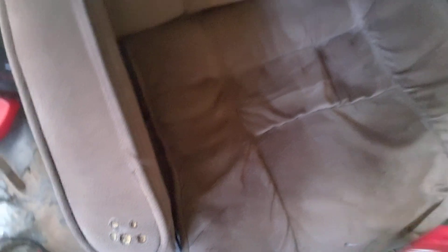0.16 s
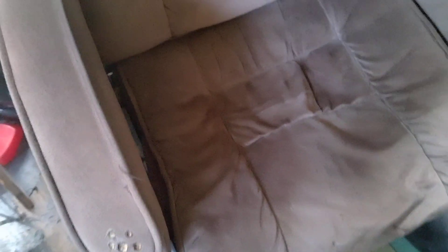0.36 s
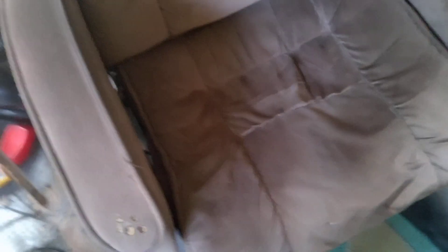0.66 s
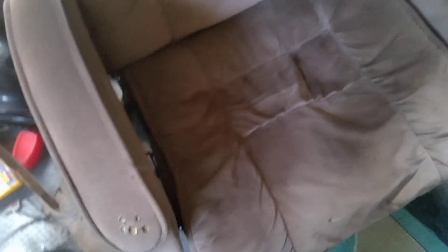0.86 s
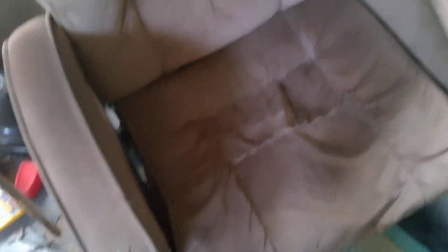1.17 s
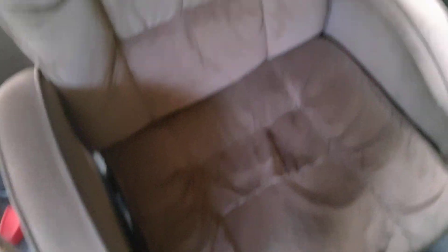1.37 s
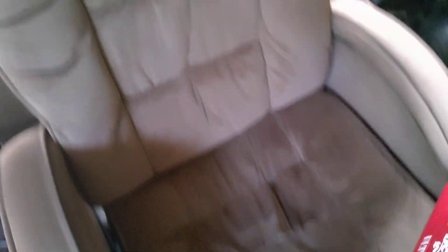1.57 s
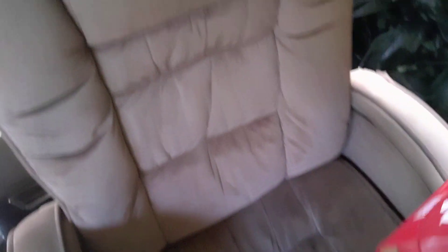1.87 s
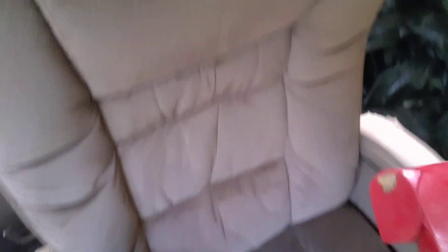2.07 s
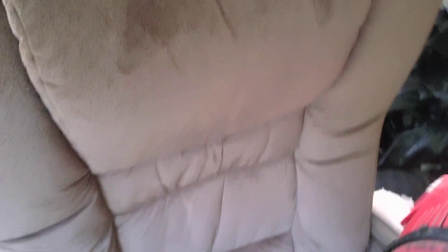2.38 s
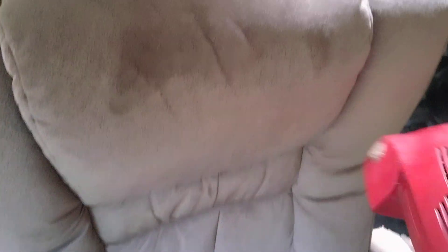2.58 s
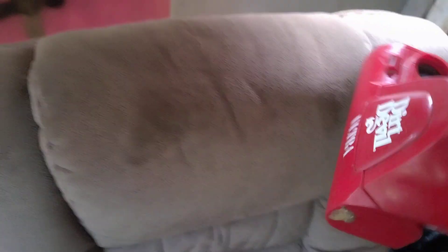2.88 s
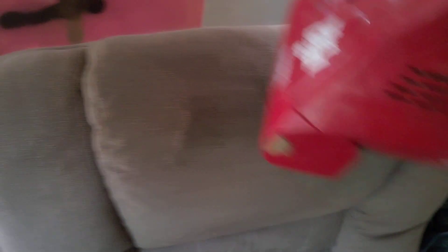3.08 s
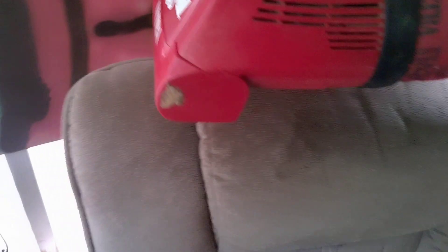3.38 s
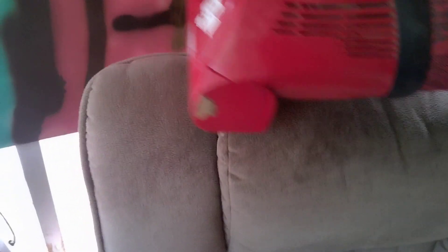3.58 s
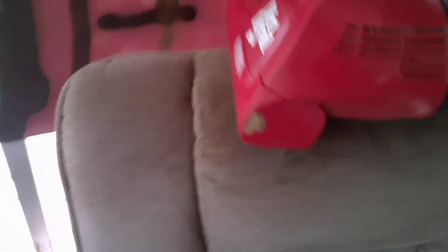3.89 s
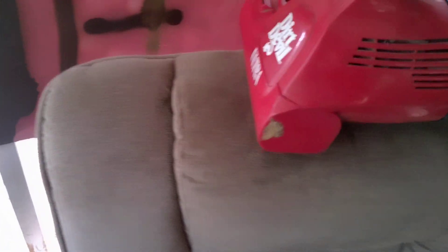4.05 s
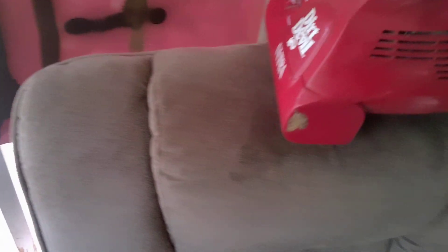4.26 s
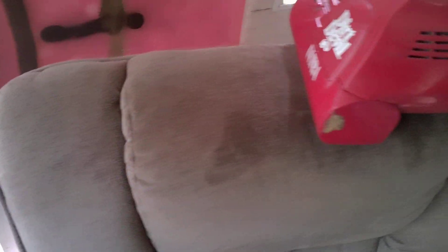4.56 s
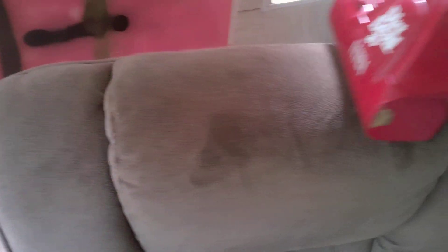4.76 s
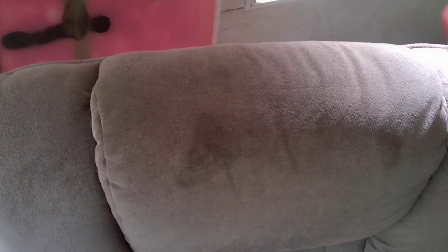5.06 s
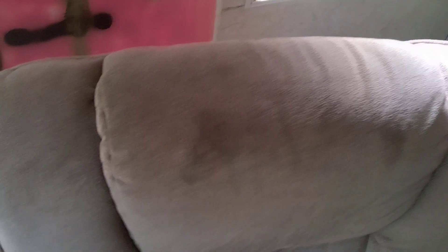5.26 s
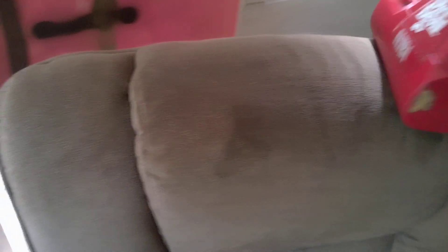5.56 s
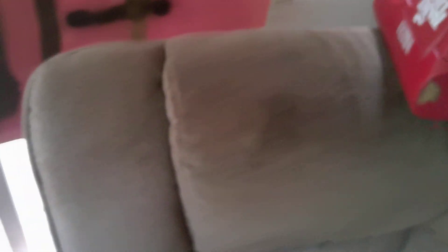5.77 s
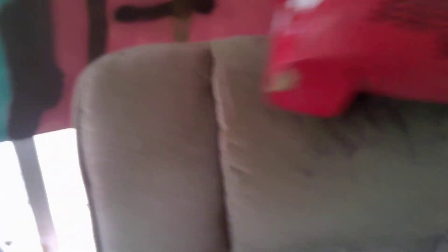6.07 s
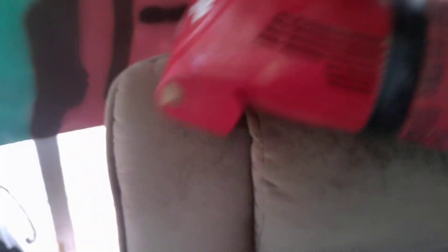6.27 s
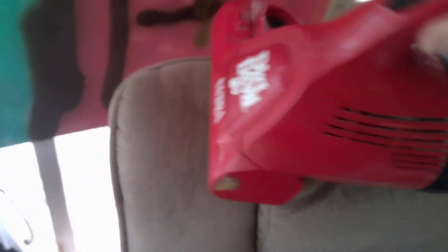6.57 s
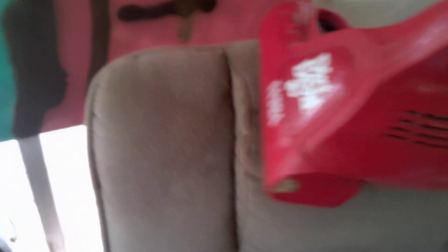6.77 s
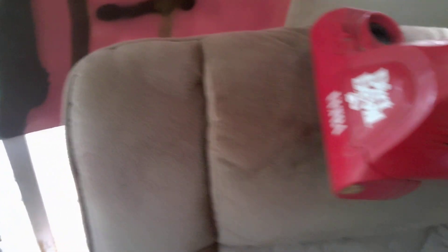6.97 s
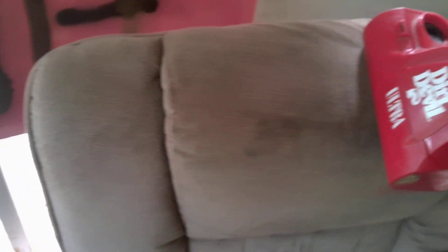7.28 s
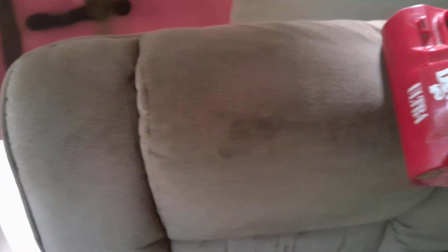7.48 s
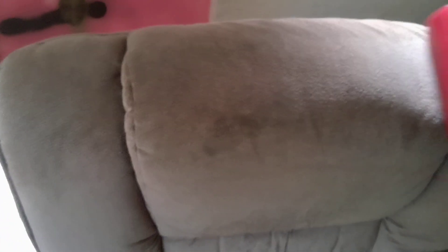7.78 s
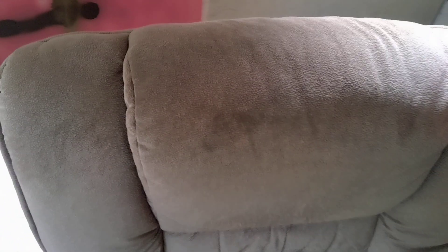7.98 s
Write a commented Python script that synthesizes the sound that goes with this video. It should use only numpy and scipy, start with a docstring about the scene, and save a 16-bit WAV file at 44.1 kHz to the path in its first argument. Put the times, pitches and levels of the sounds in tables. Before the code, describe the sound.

A high, steady motor whine and a rush of hissing air come from a small vacuum cleaner working on a fabric armchair, close to the microphone and slightly left. At first the air has a shifting, hollow colour as the gap to the cushion changes. Then the nozzle lies on the fabric and the sound grows a little fuller. The whine flutters in loudness but holds its pitch, and the motor runs throughout.

```python
"""A handheld vacuum cleaner moves over an armchair, close to a hand-swayed camera with two spaced mics.
From the start its motor sings on multiples of the shaft speed, loudest on the 27th, over a faint mains hum
and the roar and hiss of air; the left mic hears it first, by a lead that follows the machine's bearing.
In the first three seconds hollow resonances slide as the gap to the cushion changes. Then the nozzle lies
on the cushion and the housing's resonances stand out. Near 7 s a faint low moan slides up and fades."""
import sys
import numpy as np
from scipy import signal
from scipy.fft import rfft, irfft, next_fast_len
from scipy.io import wavfile
from scipy.ndimage import uniform_filter1d, map_coordinates

SR = 44100
rng = np.random.default_rng(int(sys.argv[2]) if len(sys.argv) > 2 else 0)


def waveform_to_disk(signal):
    """Save audio, clipped to [-1, 1], as 16-bit WAV at the path in sys.argv[1]."""
    frames = np.transpose(np.atleast_2d(signal))
    scaled = np.clip(frames, -1, 1) * 32767
    samples = np.round(scaled).astype(np.int16)
    wavfile.write(sys.argv[1], SR, samples)


N = 358974
TIME = np.arange(N) / SR
COARSE = np.linspace(0, N / SR, 1000)  # time grid for slow moves, s
MAINS_PULSE_HZ = 120  # twice the mains rate
# an order is a multiple of the shaft speed
WHINE_ORDER, HUM_ORDERS, VENT_ORDERS = 27, (1, 2, 3, 5), (10, 11, 15, 17, 18, 25, 29, 36)
ECHO_SHIFTED_ORDERS = (2, 10, 17, 25)

# motor speed and the whine's stereo position: [t/s, shaft f/Hz, left lead/ms]
SHAFT = [(0.0, 348.63, 0.186), (0.21, 348.49, 0.205), (0.51, 349.22, 0.334), (0.95, 349.97, 0.383),
         (1.48, 349.41, 0.27), (2.11, 349.8, 0.257), (2.35, 349.04, 0.182), (2.43, 349.17, 0.178),
         (2.52, 350.07, 0.216), (2.57, 350.11, 0.297), (2.89, 349.72, 0.35), (2.99, 349.98, 0.368),
         (3.11, 349.7, 0.335), (3.26, 349.4, 0.235), (3.41, 349.57, 0.159), (3.71, 349.37, 0.174),
         (4.08, 347.99, 0.223), (4.85, 348.21, 0.308), (4.99, 347.84, 0.376), (5.25, 346.52, 0.452),
         (5.34, 346.9, 0.447), (5.48, 348.14, 0.457), (5.56, 348.55, 0.513), (5.77, 346.87, 0.48),
         (5.89, 346.51, 0.502), (6.1, 347.73, 0.413), (6.36, 348.36, 0.266), (6.5, 348.63, 0.258),
         (6.64, 348.23, 0.316), (6.79, 348.76, 0.331), (6.92, 347.93, 0.299), (7.04, 347.64, 0.341),
         (7.53, 347.71, 0.382), (8.13, 346.77, 0.45)]
# the whine's level ride: [t/s, left level/dB, right level/dB]
WHINE_LEVELS = [(0.0, -33.5, -46.5), (0.1, -32.5, -36.5), (0.13, -26.5, -27.0), (0.19, -21.5, -21.5),
                (0.28, -18.0, -25.5), (0.34, -25.0, -30.0), (0.42, -19.5, -26.5), (0.48, -20.0, -39.5),
                (0.54, -22.0, -27.0), (0.67, -25.5, -35.0), (0.75, -22.5, -27.5), (0.81, -26.5, -31.5),
                (0.93, -23.5, -24.5), (1.09, -23.0, -31.0), (1.29, -19.0, -29.5), (1.58, -27.5, -31.0),
                (1.64, -21.0, -28.0), (1.73, -17.0, -33.0), (1.93, -21.0, -30.0), (2.05, -18.5, -23.0),
                (2.19, -16.0, -24.5), (2.39, -26.5, -29.0), (2.45, -25.5, -33.5), (2.51, -38.0, -37.0),
                (2.58, -25.0, -33.5), (2.64, -22.0, -37.5), (2.7, -22.0, -24.0), (2.86, -15.5, -26.0),
                (2.9, -15.5, -26.5), (3.01, -17.0, -47.0), (3.07, -15.5, -30.5), (3.12, -16.5, -32.0),
                (3.14, -17.0, -40.5), (3.19, -17.0, -28.5), (3.29, -17.5, -22.5), (3.34, -15.0, -29.5),
                (3.44, -17.0, -26.0), (3.62, -23.0, -31.0), (3.83, -17.5, -22.5), (4.04, -17.0, -25.0),
                (4.31, -16.5, -20.5), (4.67, -15.0, -29.0), (4.87, -16.5, -25.0), (4.95, -18.0, -34.0),
                (5.03, -17.0, -26.5), (5.14, -20.5, -42.5), (5.18, -19.5, -34.0), (5.27, -17.5, -29.0),
                (5.49, -17.0, -35.5), (5.55, -21.0, -31.0), (5.8, -18.0, -27.0), (5.85, -19.0, -30.0),
                (5.93, -21.0, -26.0), (6.04, -17.5, -35.0), (6.1, -23.0, -25.5), (6.19, -20.0, -31.0),
                (6.26, -19.5, -25.0), (6.32, -16.5, -25.0), (6.54, -20.5, -20.5), (6.62, -18.0, -20.5),
                (6.69, -15.5, -34.0), (6.81, -18.5, -35.5), (6.88, -15.5, -44.0), (6.94, -17.0, -33.5),
                (7.06, -18.5, -32.5), (7.27, -22.5, -47.5), (7.33, -25.0, -39.0), (7.64, -20.0, -34.0),
                (7.76, -25.0, -35.5), (7.92, -26.5, -46.0), (8.05, -29.5, -30.5), (8.13, -35.0, -39.5)]
# bearing: [t/s, left lead/ms of the air and most tones, then left lead/ms of each ECHO_SHIFTED_ORDERS tone]
LEFT_LEADS = [(0.0, 0.157, 0.091, 0.204, 0.157, 0.144), (0.2, 0.194, 0.173, 0.163, 0.194, 0.202),
              (0.42, 0.299, 0.427, 0.32, 0.276, 0.303), (0.53, 0.337, 0.553, 0.359, 0.339, 0.343),
              (0.89, 0.377, 0.527, 0.459, 0.37, 0.382), (1.46, 0.286, 0.421, 0.282, 0.301, 0.293),
              (2.01, 0.262, 0.047, 0.284, 0.274, 0.265), (2.47, 0.16, -0.103, 0.184, 0.16, 0.179),
              (2.64, 0.204, -0.018, 0.181, 0.199, 0.214), (3.04, 0.253, -0.131, 0.253, 0.271, 0.272),
              (3.17, 0.214, 0.03, 0.232, 0.206, 0.205), (3.33, 0.115, 0.252, 0.117, 0.093, 0.089),
              (3.41, 0.076, 0.232, 0.088, 0.037, 0.057), (3.56, 0.039, 0.063, 0.06, 0.032, 0.033),
              (4.05, 0.135, 0.181, 0.141, 0.026, 0.117), (4.81, 0.205, 0.263, 0.21, 0.013, 0.162),
              (5.15, 0.308, 0.686, 0.276, 0.121, 0.309), (5.45, 0.318, 0.64, 0.476, 0.131, 0.317),
              (5.68, 0.275, 0.512, 0.561, 0.043, 0.273), (5.97, 0.258, 0.254, 0.548, 0.088, 0.257),
              (6.12, 0.192, 0.135, 0.492, 0.043, 0.175), (6.28, 0.086, 0.012, 0.377, -0.044, 0.081),
              (6.43, 0.05, -0.013, 0.34, -0.102, 0.032), (7.09, 0.22, 0.024, 0.524, 0.045, 0.215),
              (7.7, 0.278, 0.515, 0.558, 0.119, 0.259), (8.14, 0.341, 0.466, 0.643, 0.183, 0.366)]
# low motor hum as the housing turns: [t/s, then left level/dB, right level/dB for each of HUM_ORDERS]
HUM_LEVELS = [(0.0, -56, -48, -44, -45, -41, -43, -44, -60), (0.37, -51, -57, -60, -56, -52, -55, -49, -46),
              (0.49, -49, -57, -58, -48, -51, -55, -43, -42),
              (1.06, -54, -62, -45, -55, -51, -50, -55, -59),
              (1.51, -46, -48, -49, -48, -58, -60, -41, -50),
              (2.02, -47, -45, -48, -47, -45, -49, -42, -60),
              (2.22, -45, -44, -44, -40, -53, -54, -38, -43),
              (2.53, -41, -43, -53, -46, -55, -53, -47, -45),
              (3.04, -46, -54, -46, -54, -45, -47, -39, -50),
              (3.44, -46, -44, -48, -43, -43, -43, -45, -60),
              (3.73, -57, -58, -47, -40, -46, -53, -48, -55),
              (4.36, -51, -50, -56, -45, -46, -48, -55, -50),
              (4.83, -52, -53, -47, -56, -52, -49, -57, -48),
              (5.07, -52, -53, -50, -51, -54, -49, -50, -55), (5.4, -48, -49, -49, -56, -56, -48, -57, -54),
              (5.71, -55, -52, -52, -49, -44, -45, -42, -51),
              (6.09, -51, -52, -59, -46, -42, -52, -58, -44),
              (6.34, -56, -57, -47, -40, -44, -49, -51, -52),
              (6.73, -46, -49, -60, -43, -47, -49, -48, -45),
              (7.26, -51, -54, -52, -43, -55, -55, -55, -45),
              (7.82, -56, -62, -48, -49, -60, -58, -45, -46),
              (8.13, -52, -50, -48, -53, -52, -52, -56, -46)]
# tones that swing as the vents turn: [t/s, then left level/dB, right level/dB for each of VENT_ORDERS]
VENT_LEVELS = [(0.0, -36, -47, -37, -38, -40, -50, -31, -41, -37, -36, -29, -35, -36, -43, -39, -44),
               (0.17, -44, -50, -45, -51, -44, -43, -36, -40, -38, -45, -37, -30, -34, -43, -45, -53),
               (0.43, -36, -45, -40, -46, -39, -50, -38, -48, -51, -47, -30, -40, -45, -43, -40, -51),
               (0.8, -39, -48, -41, -52, -45, -56, -38, -42, -46, -49, -39, -41, -33, -56, -40, -54),
               (1.15, -44, -53, -52, -49, -52, -48, -36, -42, -38, -41, -31, -33, -48, -46, -49, -52),
               (1.46, -45, -42, -43, -53, -42, -45, -33, -37, -43, -46, -30, -47, -37, -54, -37, -48),
               (1.74, -40, -42, -36, -46, -48, -48, -38, -46, -51, -49, -34, -37, -41, -53, -38, -47),
               (2.27, -38, -45, -44, -43, -41, -42, -33, -38, -39, -40, -29, -31, -34, -36, -41, -52),
               (2.54, -49, -40, -50, -41, -49, -48, -37, -36, -48, -48, -40, -38, -45, -59, -55, -54),
               (2.71, -40, -40, -38, -43, -40, -44, -29, -33, -44, -39, -33, -27, -34, -43, -41, -50),
               (2.95, -38, -47, -39, -39, -42, -39, -32, -47, -40, -41, -28, -40, -34, -47, -39, -40),
               (3.52, -39, -40, -43, -42, -40, -46, -34, -41, -34, -44, -29, -29, -32, -41, -49, -50),
               (3.69, -40, -44, -45, -45, -37, -46, -33, -49, -38, -39, -24, -37, -32, -40, -49, -49),
               (3.93, -40, -43, -37, -38, -43, -40, -34, -42, -36, -52, -31, -32, -34, -53, -42, -51),
               (4.56, -38, -39, -46, -40, -39, -44, -35, -46, -42, -48, -27, -33, -35, -41, -46, -52),
               (4.77, -37, -42, -45, -56, -46, -46, -34, -45, -41, -46, -33, -40, -36, -43, -45, -49),
               (5.1, -37, -45, -43, -44, -44, -46, -37, -47, -44, -47, -29, -38, -33, -47, -42, -49),
               (5.4, -38, -50, -52, -45, -48, -52, -37, -50, -44, -43, -30, -41, -34, -49, -52, -56),
               (5.63, -38, -46, -45, -40, -42, -44, -47, -46, -37, -49, -29, -35, -31, -52, -42, -50),
               (6.12, -37, -38, -41, -44, -44, -53, -33, -47, -36, -47, -28, -37, -36, -44, -43, -55),
               (6.29, -40, -44, -46, -46, -42, -49, -27, -51, -40, -40, -28, -28, -35, -43, -48, -54),
               (6.53, -38, -39, -40, -40, -39, -38, -32, -44, -32, -43, -28, -34, -34, -50, -47, -43),
               (6.96, -38, -39, -37, -42, -37, -40, -36, -47, -43, -41, -38, -46, -39, -42, -43, -46),
               (7.19, -32, -42, -41, -43, -40, -44, -37, -40, -44, -51, -31, -31, -38, -48, -41, -47),
               (7.46, -38, -39, -38, -39, -38, -41, -45, -43, -40, -45, -39, -44, -37, -46, -39, -48),
               (7.58, -35, -44, -38, -43, -41, -44, -47, -46, -43, -57, -33, -34, -37, -51, -37, -48),
               (8.13, -34, -41, -41, -54, -44, -47, -41, -44, -39, -39, -36, -44, -41, -56, -42, -51)]
# the bed of remaining motor tones: [order, left base level/dB, right base level/dB]
BED_TONES = [(4, -52, -59), (6, -56, -56), (7, -50, -51), (8, -49, -49), (9, -46, -47), (12, -52, -54),
             (13, -51, -50), (14, -56, -57), (16, -46, -52), (19, -54, -56), (20, -44, -46), (21, -49, -50),
             (22, -51, -55), (23, -42, -46), (24, -42, -46), (26, -41, -46), (28, -42, -52), (30, -50, -57),
             (31, -56, -57), (32, -46, -54), (33, -51, -57), (34, -48, -56), (37, -52, -59), (38, -53, -61)]
# swells of the air layers: [t/s, then left gain/dB, right gain/dB for each of 0 thrum through the chair,
# 1 housing rumble, 2 nozzle boom, 3 rush, 4 upper rush, 5 vent hiss]
AIR_SWELLS = [(0.0, 0, -5, 3, -1, 3, 6, 3, 5, 5, 2.0, 0.5, 5),
              (0.15, -2, -3, 3, 1.5, -2, -3, 1, 2.5, 0, 2, 3.5, -3),
              (0.4, -9, -9, 1, -1.5, -4.5, -7, -3.5, -3, -2, -2.5, -5, -0.5),
              (0.75, -6, -8, -0.5, 0, -3.5, -7, -3, -3, -1.5, -3.5, -2.5, -5),
              (1.25, -5, -7, 0.5, 0, -2, -2, -2, -1.5, -3, -3.5, -0.0, 1),
              (1.7, -4, -3.0, 0.5, 0, -1.5, -4, -3, -2.5, -0.5, -0.5, -1.5, -3),
              (1.8, -6, -5, -0.5, -2, 2, -2, -2, -3, -0.5, 3, -1, -9),
              (2.3, -3, -4, 1.5, 1.0, -0.5, -2, -1, 3, 2, -0.5, -3, 5),
              (2.4, -4, -5.5, 1.5, 0.5, -4, -1.5, 1.5, 2, 0.5, 0.5, -0.5, 2),
              (2.9, 0.5, -2, 1.5, 1.5, 4.5, -1.5, 2.5, 2.5, 2, 2.5, 1.5, 2),
              (3.25, 0, 3, 3.5, 1.0, 1.5, 2, 4.5, 4.5, 2.5, 4, 3, 1.5),
              (3.4, 3, -2, 3, 2, 5.5, 5.5, 0, 3.5, 1, 3, 0.5, 4),
              (4.25, 1, 3, 1.5, -2.5, -1.5, -2, 1.5, 2.5, -1.5, 1.5, 2, 0),
              (5.05, 1.0, -1.5, 0.5, 1, -4.5, -4, -0.5, 2, 0.5, -1, -0.5, -1.5),
              (5.15, -2.0, -2, -1, -2, -3, -5, -0.5, -2, -0.5, 0, -2, -5),
              (5.5, 1, -2, 4, 3, -3, -3, 1, 1.5, -0.5, -0.5, 2, 0),
              (5.8, 1, -1, 0, 0, 0, -3, 0.5, -0.5, -0.5, 0, 1, -4),
              (6.1, 1, 2.5, 0, -1, -0.5, 3, 0.5, 3, 1, 1, 1.5, 3),
              (6.65, 2.5, 3, 0, 1, 3, 1.5, 3.5, 3.5, 0, 3.5, 0.5, 2),
              (7.15, 0, -1, -1.5, -1.5, -2, -3, 0, 0.5, 1.5, -1, -1.0, -1),
              (7.95, 1, 1, 0, -3, -3.5, -5, -2, -2.5, -2, 0.5, -3, -3),
              (8.14, -4, -4.0, 1, -4, -6, -7, -3.5, -1, 0.5, 0, -3.5, -8)]
# crossovers between the air layers: [f/Hz, layer that rules there]
AIR_LAYERS = [(70, 1), (110, 0), (200, 0), (300, 1), (560, 1), (720, 2), (1000, 2), (1200, 3), (2400, 3),
              (3100, 4), (5000, 4), (7000, 5)]
# tone colour and width of the air: [f/Hz, left relative level/dB, right relative level/dB, likeness 0-1]
AIR_SPECTRUM = [(70, -41, -25.5, 1), (127, -16, -17, 1), (218, -15, -13.5, 1), (403, -4, -6, 0.95),
                (480, -4.5, -5.5, 0.93), (630, -7.5, -6, 0.72), (794, -4.5, -1, 1), (910, -4.5, -3.5, 0.4),
                (1110, -6.5, -10, 0.82), (1540, -5.5, -8, 0.15), (2220, -6, -7.5, 0.3),
                (3300, -10.5, -12.5, 0.78), (4530, -12.5, -15.5, 0.48), (6040, -9, -8, 0.4),
                (6560, -9.5, -12.5, 0), (9000, 0.5, -3.5, 0.64), (9970, -3, -10, 0.1),
                (11220, -16, -18.5, 0), (14200, -22.5, -28, 0.2)]
# quick random level flicker laid over the hiss, deepest near 4 and 12.5 kHz: [f/Hz, depth/dB]
TREBLE_FLICKER = [(300, 1), (2000, 2), (4000, 6), (8000, 3), (12500, 6)]
# hollow resonance between machine and cushion, sliding with the gap: [t/s, f/Hz, gain/dB]
GAP_HOLLOW = [(0, 1020, 12), (.3, 1010, 3), (.55, 995, 13.5), (1.0, 967, 11), (1.45, 900, 7.5),
              (1.75, 880, -2), (1.95, 780, -6), (2.2, 830, 9), (2.45, 900, 5), (2.7, 930, 4)]
# a lower hollow, strongest near 1.5 s: [t/s, f/Hz, gain/dB]
DEEP_HOLLOW = [(.9, 600, -1), (1.2, 563, 5), (1.5, 526, 7), (1.85, 482, 3)]
# narrow peaks and dips of the housing: [f/Hz, width/Hz, left base gain/dB, right base gain/dB]
HOUSING_PEAKS = [(400, 18, -4, 2.5), (493, 20, 4, 2), (488, 76, -2.5, -8.5), (570, 72, -3, 2)]
# they stand out once the nozzle lies on the cushion: [t/s, factor on their base gain]
HOUSING_DEPTH = [(0, -0.1), (2.9, 0.5), (3.5, 2.9), (6.2, 2.3), (6.7, 1.5), (8.14, 0.9)]
# sub rumble of the swaying camera: [f/Hz, relative level/dB]
SWAY_SPECTRUM = [(2, 1.5), (8, -16), (20, -23), (45, -27), (90, -50)]
# glide and fade of the moan: [t/s, f/Hz, level/dB]
MOAN_GLIDE = [(6.95, 130, -80), (7.06, 137, -57), (7.33, 153, -55), (7.52, 151, -57), (7.62, 148, -80)]


def amp(db):
    """Decibels to gain."""
    return 10 ** (np.asarray(db) / 20)


def read(rows, at):
    """The columns after the first, joined by straight lines."""
    first, *cols = np.transpose(rows)
    return np.array([np.interp(at, first, c) for c in cols])


def read_hz(rows, hz):
    """Columns over frequency, on a log axis."""
    rows = np.array(rows, float)
    return read(np.c_[np.log(rows[:, 0]), rows[:, 1:]], np.log(hz + 1e-3))


def wobble(rate, count=2):
    """Smooth random curves on the coarse grid, rate knots a second; by default one per mic."""
    knots = rng.standard_normal((count, 400))
    return np.array([map_coordinates(k, [COARSE * rate]) for k in knots])


def per_sample(curves):
    """Coarse curves brought up to audio rate."""
    return np.array([np.interp(TIME, COARSE, curve) for curve in curves])


def envelope(db):
    """Audio-rate gains from coarse levels."""
    return per_sample(amp(db))


def patches(shape, bins, frames):
    """A random field of spread 1, smooth over some frequency bins and time frames."""
    field = uniform_filter1d(rng.standard_normal(shape), size=bins, axis=1)
    field = uniform_filter1d(field, size=frames, axis=2)
    return field / field.std()


def filtered(x, response):
    """x through an EQ curve given as gain over frequency."""
    size = next_fast_len(N + 8192)
    return irfft(rfft(x, size) * response(np.fft.rfftfreq(size, 1 / SR)), size)[..., :N]


def shaft_angle(shaft_hz):
    """The rotor's turn: its torque pulses twice per mains cycle and it runs a little unevenly."""
    ripple = .003 * envelope(3 * wobble(41, count=1))[0] * np.sin(2 * np.pi * MAINS_PULSE_HZ * TIME)
    jitter = .045 * filtered(rng.standard_normal(N), lambda hz: 1 / (1 + (hz / 40) ** 2))
    return 2 * np.pi * np.cumsum(shaft_hz) / SR + ripple + jitter


def at_mics(angle, shaft_hz, lead_ms):
    """The shaft angle at both mics, the left one ahead by lead_ms."""
    return np.array([angle, angle - 2 * np.pi * shaft_hz * lead_ms / 1000])


def whine(angle, shaft_hz, lead_ms, flutter_db=.9, rough_db=.6, shake_rad=.3):
    """The motor's piercing top voice, trembling in level and phase."""
    level_db = read(WHINE_LEVELS, COARSE) + flutter_db * wobble(12) + rough_db * wobble(24)
    phase = WHINE_ORDER * at_mics(angle, shaft_hz, lead_ms) + per_sample(shake_rad * wobble(12))
    return np.sqrt(2) * envelope(level_db) * np.sin(phase)


def motor_tones(angle, shaft_hz, fade_db=2.2, flutter_db=.8, rough_db=1.5, echo_turn_rad=.3):
    """The chord under the whine: the shaking hand makes it flutter, the buffeting air roughens it."""
    body_ms, *shifted_ms = read(LEFT_LEADS, TIME)
    shifted_leads = dict(zip(ECHO_SHIFTED_ORDERS, shifted_ms))
    rides_db = np.r_[read(HUM_LEVELS, COARSE), read(VENT_LEVELS, COARSE)].reshape(-1, 2, len(COARSE))
    tones = list(zip(HUM_ORDERS + VENT_ORDERS, rides_db))
    # the bed swells with the upper rush, and echoes off the cushions fade it in and out
    upper_rush_db = read(AIR_SWELLS, COARSE)[8:10]
    for order, *base_db in BED_TONES:
        tones.append((order, np.c_[base_db] + upper_rush_db + fade_db * wobble(1.515)))
    chord = np.zeros((2, N))
    for order, level_db in tones:
        phase = order * at_mics(angle, shaft_hz, shifted_leads.get(order, body_ms))
        echo_turn = per_sample(echo_turn_rad * wobble(1.5))
        if order not in shifted_leads:
            phase += echo_turn
        gain = envelope(level_db + flutter_db * wobble(7) + rough_db * wobble(22))
        chord += gain * np.sin(phase + rng.uniform(0, 2 * np.pi))
    return np.sqrt(2) * chord


def mains_hum(level_db=-72.5, drift_db=3):
    """The windings hum at twice the mains rate."""
    gain = envelope(level_db + drift_db * wobble(4))
    return np.sqrt(2) * gain * np.sin(2 * np.pi * MAINS_PULSE_HZ * TIME)


def resonances_db(hz, t, hollow_width_hz=60):
    """Moving bell EQ on the air: two sliding hollows and the housing's peaks and dips."""
    eq_db = np.zeros((2, len(hz), len(t)))
    for centre_hz, gain_db in (read(GAP_HOLLOW, t), read(DEEP_HOLLOW, t)):
        eq_db += gain_db * np.exp(-((hz[:, None] - centre_hz) / hollow_width_hz) ** 2)
    for centre_hz, width_hz, *base_db in HOUSING_PEAKS:
        bell = np.c_[base_db] * np.exp(-((hz - centre_hz) / width_hz) ** 2)
        eq_db += bell[..., None] * read(HOUSING_DEPTH, t)[0]
    return eq_db


def air(gain_db, drift_db=1.2):
    """Turbulent air: partly one noise at both mics, late on the right, partly scattered by cushions."""
    hz, t, noise = signal.stft(rng.standard_normal((3, N)), SR, nperseg=2048, noverlap=1536)
    left_db, right_db, likeness = read_hz(AIR_SPECTRUM, hz)[:, :, None]
    right_delay = np.exp(-2j * np.pi * hz[:, None] * read(LEFT_LEADS, t)[0] / 1000)
    direct, scattered = np.array([noise[0], noise[0] * right_delay]), noise[1:]
    pair = np.sqrt(likeness) * direct + np.sqrt(1 - likeness) * scattered
    # each layer's swell rules its own range and crossfades into the next
    crossfade = read_hz([(centre_hz, *np.eye(6)[layer]) for centre_hz, layer in AIR_LAYERS], hz)
    layers_db = read(AIR_SWELLS, t).reshape(-1, 2, len(t))
    swell_db = np.einsum("lf,lct->cft", crossfade, layers_db)  # layer, channel, frequency, time
    swell_db += drift_db * patches(pair.shape, bins=8, frames=45)
    swell_db += read_hz(TREBLE_FLICKER, hz)[0][:, None] * patches(pair.shape, bins=16, frames=4)
    gain = amp(gain_db + np.array([left_db, right_db]) + swell_db + resonances_db(hz, t))
    return signal.istft(pair * gain, SR, nperseg=2048, noverlap=1536)[1][:, :N]


def camera_sway(left_db, right_db):
    """Slow pressure lumps on each mic port as the camera moves."""
    lumps = envelope(2.5 * wobble(2.5)) * rng.standard_normal((2, N))
    rumble = filtered(lumps, lambda hz: amp(read_hz(SWAY_SPECTRUM, hz)[0]) * (hz < 200))
    return amp([[left_db], [right_db]]) * rumble / rumble.std()


def moan():
    """A faint rising moan, dead centre, perhaps the brush dragging on the cloth."""
    hz, level_db = read(MOAN_GLIDE, TIME)
    return np.sqrt(2) * amp(level_db) * np.sin(2 * np.pi * np.cumsum(hz) / SR)


def scene():
    """The stereo mix; one shaft drives the whine and the chord under it."""
    shaft_hz, whine_lead_ms = read(SHAFT, TIME)
    angle = shaft_angle(shaft_hz)
    motor = whine(angle, shaft_hz, whine_lead_ms) + motor_tones(angle, shaft_hz)
    return motor + mains_hum() + air(gain_db=-17.5) + camera_sway(left_db=-49.5, right_db=-60.0) + moan()


def record(dry, top_hz=14260):
    """The camera keeps nothing above its band limit."""
    return filtered(dry, lambda hz: hz < top_hz)


dry = scene()
out = record(dry)
waveform_to_disk(out)
```